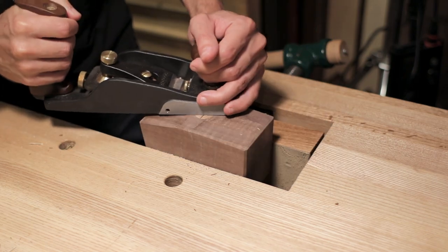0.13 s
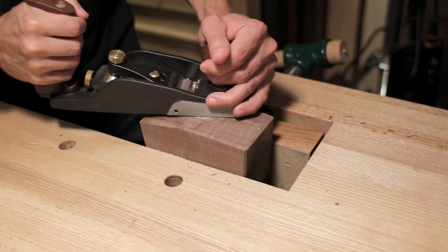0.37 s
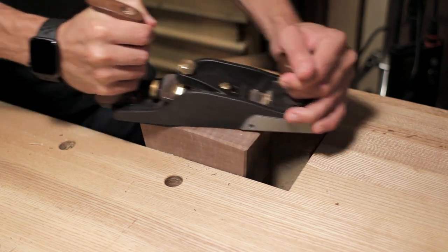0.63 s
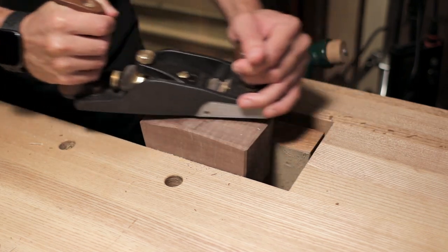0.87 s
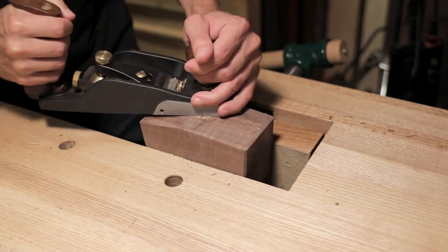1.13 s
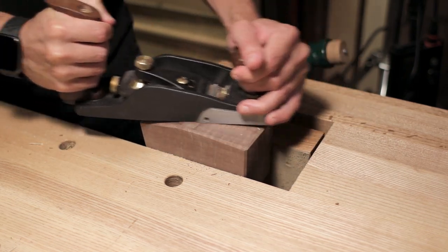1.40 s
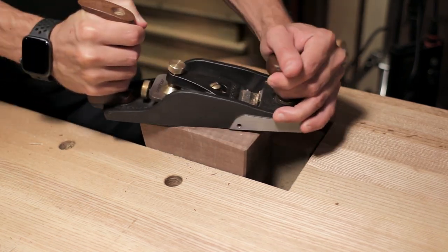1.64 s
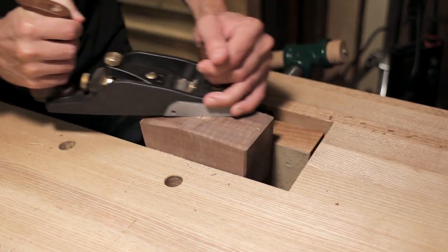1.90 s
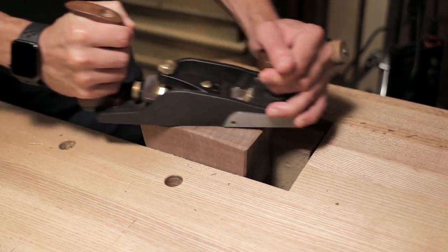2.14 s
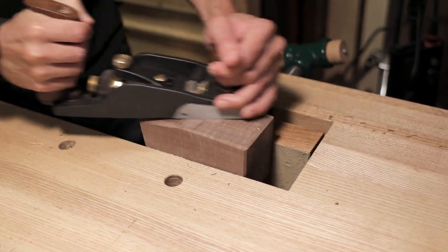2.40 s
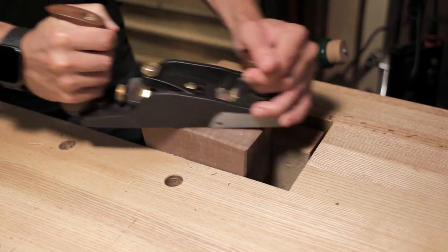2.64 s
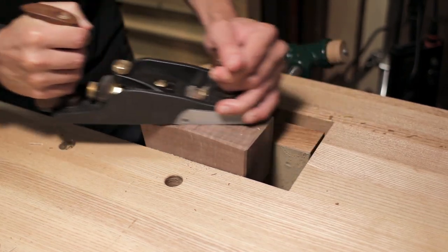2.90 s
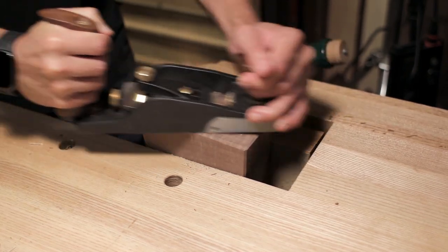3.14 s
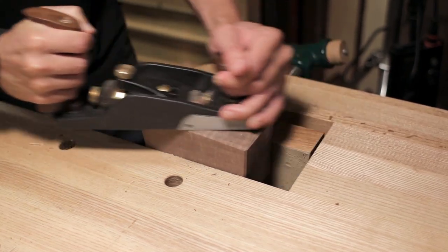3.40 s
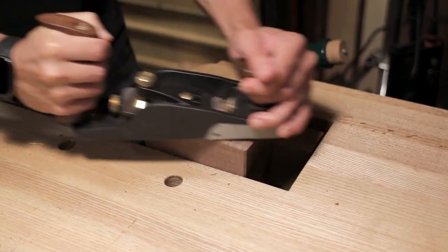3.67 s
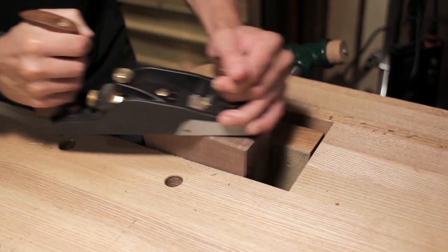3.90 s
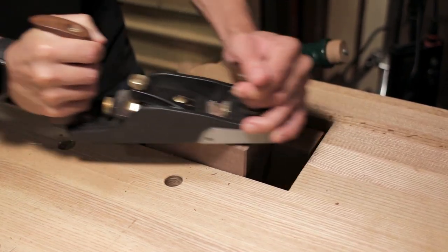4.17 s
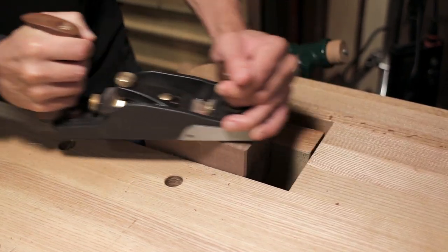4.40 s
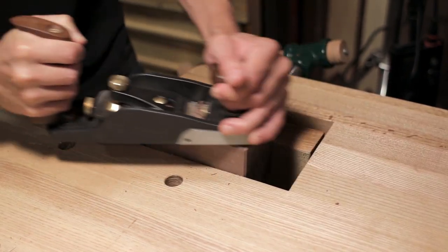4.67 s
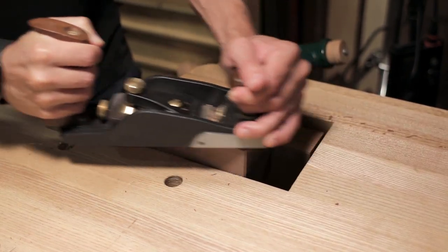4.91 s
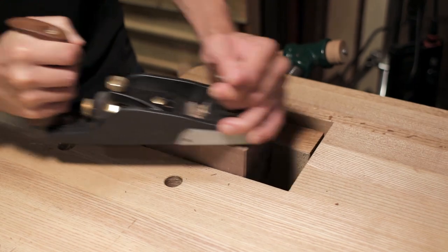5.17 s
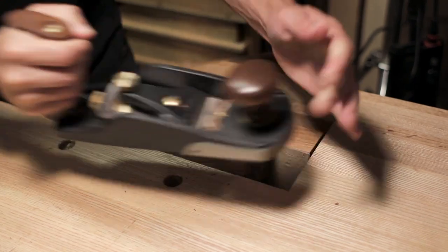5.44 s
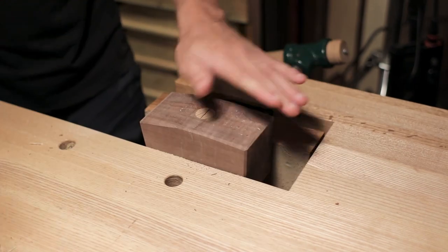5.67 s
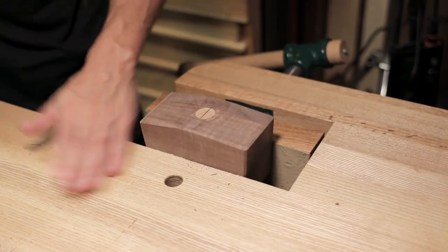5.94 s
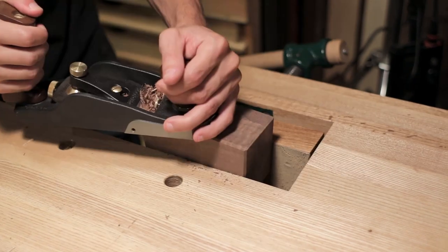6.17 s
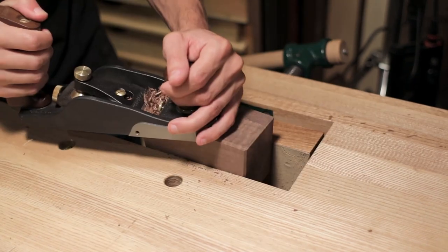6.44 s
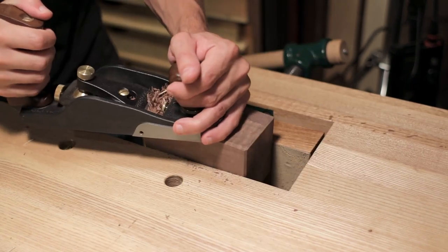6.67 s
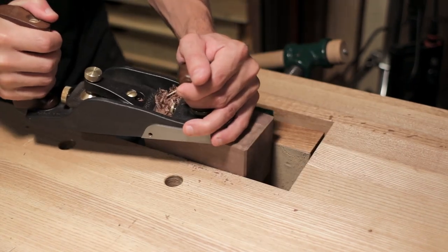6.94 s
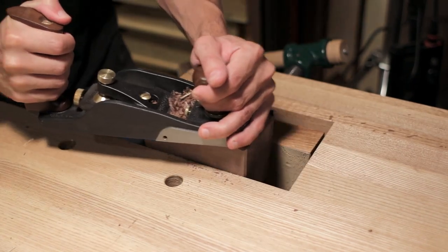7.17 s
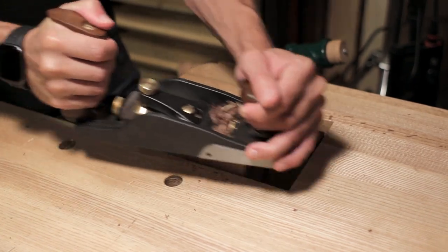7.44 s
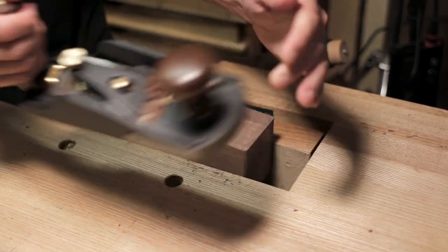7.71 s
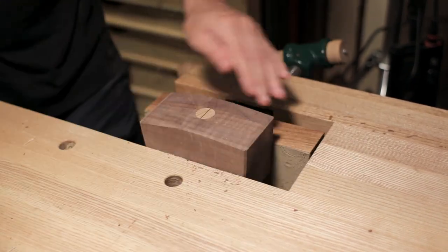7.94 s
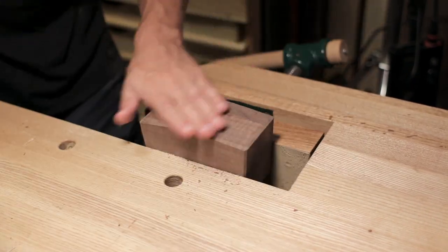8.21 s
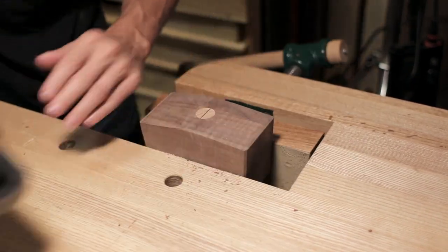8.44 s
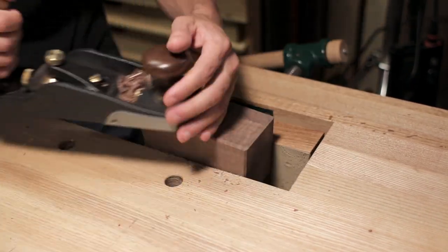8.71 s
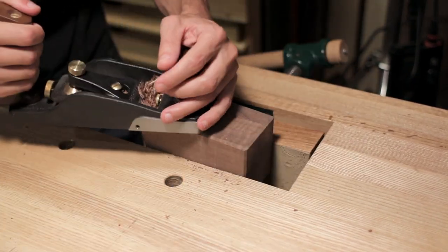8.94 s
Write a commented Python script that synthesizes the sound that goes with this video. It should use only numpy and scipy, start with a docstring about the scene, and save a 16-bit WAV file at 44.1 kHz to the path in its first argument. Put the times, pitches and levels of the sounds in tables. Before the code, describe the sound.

Short gritty planing strokes on end-grain wood, woody thumps between them, then a hard knock and one slow halting scrape over faint room hiss.

```python
"""A small workshop: a metal hand plane takes quick cuts across an end-grain block in a bench vice.
Snapping fibres ring the blade, iron body, bench, sole and lever cap through resonators; between cuts the
sole drops back in dull knocks built from bench modes. The plane drags and rattles, and twice a palm wipes
the block in soft grains. A noise-tap room rings briefly. Filtered noise gives hiss and droning insects,
sines give mains hum, square dips a faint electrical tick. One microphone hears it all."""
import sys
import numpy as np
from scipy import signal
from scipy.fft import rfft, irfft
from scipy.io import wavfile
from scipy.ndimage import uniform_filter1d

SR = 44100
rng = np.random.default_rng(int(sys.argv[2]) if len(sys.argv) > 2 else 0)


def volts_from_decibels(level):
    """Turn decibel levels (scalar or array-like) into linear amplitude factors."""
    exponent = np.asarray(level, float) / 20
    return 10 ** exponent


def file_out(sig):
    """Save sig as 16-bit WAV at sys.argv[1]."""
    # one column per channel
    cols = np.atleast_2d(sig).T
    # limit, then scale
    lim = np.clip(cols, -1, 1)
    pcm = np.round(lim * 32767).astype(np.int16)
    wavfile.write(sys.argv[1], SR, pcm)


N = 400428  # length in samples

# Tone of air and hiss. Each row: frequency in Hz, relative density in dB per Hz.
AIR_TONE = [(20, -10), (40, 0), (60, -20), (85, 3), (120, -4.5), (300, -6), (1000, -13), (2000, -14),
            (4000, -17), (8000, -20.5), (15500, -23)]
# Insect bands. Each row: centre in Hz, width in Hz, level in dB before the creep.
INSECTS = [(2570, 210, -72), (2940, 40, -80), (4780, 230, -76), (5550, 260, -70), (5800, 220, -70)]
# Mains hum. Each row: frequency in Hz, level in dB rms before the creep.
HUM = [(59.6, -73), (119.3, -72)]
# Runs of the electrical tick, 30 a second. Each row: first tick in seconds, end of run in seconds.
TICK_RUNS = [(.0113, 6.1), (6.1252, 9.08)]
# Slow creep of the background. Each row: time in seconds, gain in dB.
CREEP = [(0, -9), (1.05, -7), (1.4, -5), (1.85, -4), (3.5, -1.5), (5.6, -1), (6.1, -0.5), (6.2, -0.2),
         (7.1, 1), (9.1, -0.5)]
# Tone of the faint stereo noise. Each row: frequency in Hz, relative density in dB per Hz.
STEREO_NOISE_TONE = [(25, 20.5), (100, 14), (500, 5), (3000, -0.5), (15000, 2)]
# Decay of the room. Each row: frequency in Hz, t60 in seconds.
ROOM_DECAY = [(100, 0.64), (250, 0.4), (1000, 0.49), (2000, 0.51), (4000, 0.27), (8000, 0.27),
              (15000, 0.52)]
# Palm over the block, one table a wipe. Each row: time in seconds, level in dB.
WIPES = [
    [(5.85, -70), (5.882, -58), (5.94, -48), (6.014, -50), (6.05, -60.5), (6.12, -71)],
    [(8.19, -65.5), (8.304, -50), (8.326, -54.5), (8.356, -50.5), (8.49, -69)],
]
# Tone of skin on wood. Each row: frequency in Hz, relative density in dB per Hz.
SKIN_TONE = [(410, -43), (700, -13), (1320, -2.5), (1730, -9), (2080, -6), (2590, -7), (5290, -2),
             (9230, -5), (15500, -18)]
# Small parts rattle. Each row: start in seconds, click peak in dB, click pitch in Hz, body tap peak in dB.
RATTLES = [(3.9787, -42.5, 7650, -62), (5.47, -47, 6160, -46), (5.4882, -46.5, 7160, -41.5),
           (5.666, -48, 4000, -52), (5.7003, -53, 7100, -52), (6.539, -43, 6900, -61),
           (7.69, -64, 6750, -46), (7.7162, -40.5, 8330, -48), (7.764, -54, 7500, -72)]
# Modes of bench and block. Each row: frequency in Hz, relative level in dB, free t60 in seconds.
BENCH_MODES = [(103, -8, 0.13), (162.8, -21.5, 0.19), (224.5, 2, 0.058), (236.5, 6.5, 0.055),
               (292, -7.5, 0.22), (389, -2, 0.091), (446.6, -2, 0.23), (537, -1.5, 0.089), (618, 7.5, 0.05),
               (702, -6.5, 0.17), (806, -2, 0.3), (868, 11, 0.046), (900, -3.5, 0.034), (1390, -26, 0.091),
               (1750, -8, .07), (2220, -4, .045), (2450, -27, .04), (3600, -30, .03)]
# The plane drawn back, and the palm pushing the block. Each row: start in seconds, level in dB,
# length in seconds.
DRAGS = [(2.301, -53, .05), (2.357, -54, 0.13), (2.846, -49, .07), (3.347, -45, 0.093), (3.887, -39, 0.04),
         (4.362, -47, 0.02), (4.432, -43.5, 0.047), (4.94, -47, 0.049), (5.89, -68, 0.17)]
# The sole lands or rocks. Each row: start in seconds, peak in dB, frequency in Hz favoured by the spot
# struck, contact time scale in ms, gain of the deep modes in dB, factor on ringing time (small when the
# plane stays pressed down).
KNOCKS = [(0.077, -21.5, 620, 0.17, -9, 1), (0.219, -45, 215, 0.35, 15, 1),
          (0.329, -62.5, 217, 0.13, -1, 0.94), (1.102, -14.5, 674, 0.15, -15, 0.92),
          (1.763, -43.5, 222, 0.46, 4, 0.58), (2.049, -39, 410, 0.21, 0.1, 0.55),
          (2.312, -42, 291, 0.41, 0.1, 0.23), (2.366, -44, 213, 0.48, 4, 0.63),
          (2.597, -36.5, 234, 0.24, 3, 0.47), (2.837, -32.5, 310, 0.72, 5, 0.47),
          (2.862, -33, 223, 0.48, 0.1, 0.64), (2.882, -51, 221, 0.37, -4, 1),
          (3.107, -35.5, 237, 0.31, -2, 0.7), (3.345, -34, 277, 0.49, 3, 0.44),
          (3.361, -34.5, 393, 0.35, -2, 1), (3.388, -34, 231, 0.23, 6, 0.43),
          (3.621, -36, 246, 0.45, 3, 0.33), (3.861, -48, 277, 0.25, -2, 0.7),
          (3.884, -20, 257, 0.3, 4, 0.77), (4.125, -34.5, 237, 0.5, -10, 0.36),
          (4.369, -32.5, 299, 0.32, -3, 0.45), (4.404, -20.5, 395, 0.24, -2, 0.93),
          (4.434, -26, 248, 0.45, -1, 0.77), (4.648, -34, 243, 0.41, 0.1, 0.47),
          (4.935, -29, 400, 0.17, -6, 0.76), (5.17, -31.5, 420, 0.27, -15, 0.22),
          (5.854, -43, 191, 1, 32, 0.74), (6.058, -39, 244, 0.64, 22, 0.66),
          (6.448, -9, 410, 0.33, 11, 0.47), (6.761, -45, 513, 0.44, 29, 1),
          (7.386, -31, 291, 0.3, -2, 0.17), (7.514, -26, 261, 0.56, 18, 0.79),
          (7.896, -46, 250, 0.45, -2, 0.99)]
# Quick cuts, the last a scuff as the plane lifts. Each row: bite in seconds, length in seconds, hardest
# shove in seconds after the bite, then rubbing, plane body and bench rumble in dB before FOLLOW.
CUTS = [(0.583, 0.063, 0.063, -55, -50, -53.5), (1.463, 0.1, 0.056, -56.5, -49, -51),
        (1.915, 0.054, 0.061, -54, -46.5, -44.5), (2.144, 0.053, 0.018, -51.5, -43, -44.5),
        (2.449, 0.055, .05, -53.5, -45, -47), (2.684, .047, 0.014, -50, -40, -42),
        (2.975, 0.037, 0.021, -51, -43.5, -42.5), (3.202, .047, 0.023, -49, -40, -39.5),
        (3.499, 0.034, 0.02, -50, -40, -40.5), (3.724, 0.046, 0.017, -46, -36, -37),
        (4, 0.046, 0.024, -49, -39.5, -37), (4.217, 0.043, 0.041, -46, -36, -34),
        (4.509, 0.049, 0.02, -48.5, -39, -33.5), (4.748, 0.057, 0.047, -47.5, -35, -37.5),
        (5.03, 0.066, 0.027, -50.5, -39.5, -36), (5.257, 0.061, 0.044, -47.5, -37, -38),
        (7.685, 0.04, 0.027, -68, -65, -84)]
# One slow, halting cut. Each row: time in seconds, then rubbing, plane body, bench rumble, sole rasp
# and cap buzz in dB.
SLOW_CUT = [(7.29, -70, -62, -69, -70, -74), (7.298, -74, -62, -63, -67, -75),
            (7.32, -63, -58, -60, -57, -67), (7.352, -68, -50.5, -60, -58, -66),
            (7.362, -58, -47, -54, -55, -55), (7.392, -62, -48.5, -42, -54, -54),
            (7.428, -55, -52.5, -58, -57, -50.5), (7.452, -59, -47, -48.5, -50, -57),
            (7.464, -58, -42, -51, -55, -54), (7.484, -50, -41.5, -45, -47.5, -49),
            (7.508, -52, -46, -42, -51, -57), (7.518, -45.5, -39.5, -41, -54, -51),
            (7.54, -74, -49, -50, -66, -68), (7.62, -69, -65, -56, -72, -72)]
# How blade, body, bench, sole and cap, in that order, follow a quick cut. Each row: gain in dB, climb from
# bite to shove in dB, sag after it in dB/s, drop past the far edge in dB/s, lead in seconds, dB gained per
# dB of lightness.
FOLLOW = [(-1.3, 2.5, 42, 1400, 0.0043, 0.1), (0.2, 11.5, 302, 150, 0.0045, -0.19),
          (-1.53, 12, 233, 93, 0.0067, 0.15), (0.5, 2.5, 100, 1500, 0.0013, 0.45),
          (-4, 7, 150, 800, .003, -0.5)]
# Tone of the blade's sizzle. Each row: frequency in Hz, relative density in dB per Hz.
BLADE_TONE = [(3290, -40), (5600, -2.5), (7420, 2), (8110, -5.5), (8990, -7.5), (10400, -12), (15500, -14)]
# Ringing of the blade. Each row: frequency in Hz, width in Hz, relative level in dB.
BLADE_RING = [(7000, 190, -3), (7354, 160, 11.5), (9190, 600, 8), (12400, 170, 2)]
# Ringing of the iron body. Each row: frequency in Hz, width in Hz, relative level in dB.
BODY_RING = [(750, 270, -2), (1004, 155, 1), (1340, 335, -3), (1983, 230, -3), (2033, 98, 1.5),
             (2390, 440, -8.5), (3077, 168, -10)]
# Where the sole sings as it rubs. Each row: frequency in Hz, width in Hz, relative level in dB.
SOLE_RING = [(4630, 1050, -2.5), (5140, 360, 19.5)]
# Ringing of the lever cap over the blade. Each row: frequency in Hz, width in Hz, relative level in dB.
CAP_RING = [(3340, 70, -23), (4000, 39, -6.2)]


def evened(x):
    """Scales to rms 1."""
    return x / np.sqrt(np.mean(x ** 2) + 1e-20)


def read(points, hz):
    """Reads a table on a log-frequency axis."""
    f, value = np.transpose(points)
    return np.interp(np.log(hz + 1), np.log(f + 1), value)


def colour(x, points):
    """Gives x a spectrum."""
    hz = np.fft.rfftfreq(len(x), 1 / SR)
    return irfft(rfft(x) * volts_from_decibels(read(points, hz)), len(x))


def ring(x, hz, width):
    """One damped resonance; at 0 Hz it becomes a gentle low-pass."""
    r = np.exp(-np.pi * abs(width) / SR)
    pole = r * np.exp(2j * np.pi * hz / SR)
    return 2 * signal.lfilter([1 - r], [1, -pole], x).real


def flutter(depth_db, size):
    """Uneven pressure: a gain that wanders over size samples."""
    wander = uniform_filter1d(rng.standard_normal(N), size)
    return volts_from_decibels(depth_db * evened(uniform_filter1d(wander, size)))


def rings(x, table, wander_db):
    """Resonances of alternate sign, each swelling and fading as the grip shifts if wander_db is above 0."""
    out = 0
    for k, (hz, width, db) in enumerate(table):
        out = out + (-1) ** k * volts_from_decibels(db) * ring(x * flutter(wander_db, size=2500), hz, width)
    return out


def fibres(per_s, spread_db):
    """Clicks of random sign and size: fibres that catch and snap."""
    size = volts_from_decibels(spread_db * np.minimum(rng.exponential(1, N), 4.2))
    sign = rng.choice([-1., 1.], N)
    return evened(size * sign * (rng.random(N) < per_s / SR))


def envelope(tables, column):
    """Gain over time from level tables; each fades in over 8 ms, silence between them."""
    t, out = np.arange(N) / SR, np.zeros(N)
    for rows in tables:
        rows = np.array(rows)
        gain = volts_from_decibels(np.interp(t, rows[:, 0], rows[:, column], -200, -200))
        fade_in = np.clip((t - rows[0, 0]) / 0.008, 0, 1)
        out = np.maximum(out, gain * fade_in)
    return uniform_filter1d(out, 130)


def add(mix, s, sound):
    """Mixes a sound in at time s."""
    part = mix[round(s * SR):][:len(sound)]
    part += sound[:len(part)]


def creep():
    """Slow gain of the background noises."""
    return volts_from_decibels(np.interp(np.arange(N) / SR, *np.transpose(CREEP)))


def air():
    """Air and hiss: shaped noise."""
    return volts_from_decibels(-61) * evened(colour(rng.standard_normal(N), AIR_TONE))


def insects():
    """Droning bands of noise, resonated twice for steep sides, each gently wavering."""
    out = 0
    for hz, width, db in INSECTS:
        band = ring(ring(rng.standard_normal(N), hz, width), hz, width)
        out = out + volts_from_decibels(db) * evened(band) * flutter(0.35, size=4000)
    return out


def mains_hum():
    """Steady sines of random phase."""
    t = np.arange(N) / SR
    return sum(np.sqrt(2) * volts_from_decibels(db) * np.sin(2 * np.pi * (hz * t + rng.random())) for hz, db in HUM)


def electrical_tick():
    """Square dips of 0.43 ms, 30 a second, uneven in level."""
    ticks = np.zeros(N)
    for first, last in TICK_RUNS:
        at = (np.arange(first, last, 1 / 30) * SR).astype(int)
        ticks[at] = volts_from_decibels(-50.5 + 2.2 * rng.standard_normal(len(at)))
    return -np.convolve(ticks, np.ones(19))[:N]


def background():
    """Air, insects, hum and tick under one creeping gain."""
    return (air() + insects() + mains_hum() + electrical_tick()) * creep()


def room(x):
    """Sparse taps of random sign, each band dying at its own speed.

    Three random tails crossfade in turn, so no one pattern of taps stays."""
    at, out = np.arange(150, SR - 20, 20), 0
    for k in range(3):
        taps = np.zeros(SR)
        taps[at + rng.integers(0, 20, len(at))] = rng.choice([-1., 1.], len(at))
        hz, t, bands = signal.stft(taps, SR, nperseg=256)
        decay = volts_from_decibels(-60 * t / read(ROOM_DECAY, hz)[:, None])
        tail = signal.istft(bands * decay, SR, nperseg=256)[1]
        turn = np.sqrt(2 / 3) * np.cos(np.pi * (np.arange(N) / SR * 3 + k / 3))
        out = out + signal.oaconvolve(x * turn, tail / np.linalg.norm(tail))[:N]
    return out


def wipes():
    """Skin and dust rub over wood: dense soft grains."""
    grains = evened(colour(fibres(14000, 4.5), SKIN_TONE))
    return grains * flutter(0.76, size=300) * envelope(WIPES, column=1)


def rattles():
    """Small parts of the plane: short bright clicks that also tap the iron body."""
    t, out = np.arange(1500) / SR, np.zeros(N)
    for s, peak_db, hz, body_db in RATTLES:
        puff = rng.standard_normal(len(t)) * volts_from_decibels(-60 * t / 0.024) * np.minimum(t / 0.0013, 1)
        click = ring(puff, hz, 830) + 0.37 * ring(puff, 3700, 5000)
        tap = ring(puff, 1450, 300) + 0.83 * ring(puff, 2450, 150)
        add(out, s, volts_from_decibels(peak_db) * click / abs(click).max() + volts_from_decibels(body_db) * tap / abs(tap).max())
    return out


def drags():
    """Sliding over the block shakes the low bench modes; each slide fades as it slows."""
    shoves, gain = ring(fibres(2300, 5.4), 0, 260), np.zeros(N)
    for s, db, length in DRAGS:
        t = np.arange(0, 1.5 * length, 1 / SR)
        fade_db = -13 * (t / length) ** 2
        add(gain, s, np.minimum(t / 0.0098, 1) * volts_from_decibels(db + fade_db))
    low = [(hz, 3.4 / t60, db) for hz, db, t60 in BENCH_MODES[:7]]
    return rings(shoves * gain, low, 2.86) / np.std(rings(shoves, low, 0))


def knocks():
    """A short push and its rebound ring the bench modes, most those near the spot struck, with a woody scatter."""
    hz, db, t60 = np.transpose(BENCH_MODES)[..., None]
    t, out = np.arange(SR // 3) / SR, np.zeros(N)
    rumble_cut = signal.butter(2, 100, "high", fs=SR, output="sos")
    for s, peak_db, spot_hz, contact_ms, deep_db, free in KNOCKS:
        octaves = np.log2(hz / spot_hz) ** 2  # squared distance from the favoured pitch
        spot_db = -4.5 * octaves / (1 + 0.3 * octaves) + deep_db * (hz < 190)
        modes = volts_from_decibels(db + spot_db - 60 * t / (free * t60)) * np.sin(2 * np.pi * hz * t)
        scatter_gain = volts_from_decibels(18.5 - 60 * t / 0.069) + volts_from_decibels(-7.5 - 60 * t / (free * 0.034))
        scatter = rng.standard_normal(len(t)) * scatter_gain
        u = t[:600] / (contact_ms / 1000)
        push = u ** 2 * np.exp(-1.5 * u)
        bounced = push + 0.33 * np.roll(push, round(0.003096 * SR))  # rebound 3.1 ms later
        blow = signal.oaconvolve(modes.sum(0), bounced) + signal.oaconvolve(scatter, push)
        blow = signal.sosfilt(rumble_cut, blow)
        add(out, s, volts_from_decibels(peak_db) * blow / abs(blow).max())
    return out


def stroke(column, slow_column, follow):
    """Gain of one part over all cuts: it climbs to the hardest shove, sags, and drops past the far edge."""
    db, climb, sag, drop, lead, gain = follow
    middling_db = -7  # rubbing minus body level of an average cut; light skims lie above it
    t, out = np.arange(-0.1, 0.25, 1 / SR), np.zeros(N)  # seconds from the bite
    for row in CUTS:
        s, length, shove = row[:3]
        lightness_db = row[3] - row[4] - middling_db
        past = np.maximum(t - length, 0)
        cut_db = -climb * np.maximum(1 - t / shove, 0) - sag * np.maximum(t - shove, 0) - drop * past
        # the sole slides on after the edge leaves the wood, then rubs faintly while drawn back
        return_db = -28 - 20 * (t / t[-1]) ** 6
        slide_db = np.maximum(-13 - 141 * past, return_db)
        approach_db = -19.5 + 139 * t  # the toe slides up before the edge bites
        bite = np.clip((t + lead) / 0.0073, 0, 1)
        shape = bite * volts_from_decibels(np.maximum(cut_db, slide_db)) + (1 - bite) * volts_from_decibels(approach_db)
        add(out, s + t[0], shape * volts_from_decibels(row[column] + gain * lightness_db))
    return volts_from_decibels(db) * out + envelope([SLOW_CUT], column=slow_column)


def cuts():
    """Snapping fibres shake blade, iron body, bench, sole and cap; levels act before the ringing."""
    snaps, chatter = fibres(7000, 5.0), flutter(1.33, size=200)
    sizzle = evened(colour(fibres(20000, 1.9), BLADE_TONE))
    judder = ring(fibres(900, 2.16), 0, 840)  # slower, rounder shoves reach the heavy bench
    rasp_band = signal.butter(2, [2800, 6000], "band", fs=SR, output="sos")
    rasp = signal.sosfilt(rasp_band, fibres(14000, 2.9))
    loaded = [(hz, 4.17 / t60, db) for hz, db, t60 in BENCH_MODES[:8]]  # pressure widens the bench modes
    # each part: source, resonances, share of plain source, level column in CUTS and in SLOW_CUT
    parts = [(sizzle, BLADE_RING, 0.9, 3, 1), (snaps, BODY_RING, 0, 4, 2), (judder, loaded, 0, 5, 3),
             (rasp, SOLE_RING, 0.2, 3, 4), (rasp, CAP_RING, 0.2, 3, 5)]
    out = 0
    for (x, table, plain, column, slow_column), follow in zip(parts, FOLLOW):
        steady = plain * x + rings(x, table, 0)
        pushed = x * chatter * stroke(column, slow_column, follow)
        out = out + (plain * pushed + rings(pushed, table, 2.78)) / np.std(steady)
    return out


def scene():
    """The work, its room and the background reach one microphone."""
    work = cuts() + drags() + knocks() + rattles() + wipes()
    heard = work + volts_from_decibels(-7.5) * room(work)
    bass_cut = signal.butter(6, 84, "high", fs=SR, output="sos")  # the bench radiates no deep bass
    heard = signal.sosfilt(bass_cut, heard)
    return np.tile(heard + background(), (2, 1))


def band_limit(x):
    """A steep low-pass at the top of the band."""
    return signal.sosfilt(signal.butter(12, 15770, fs=SR, output="sos"), x)


def record(dry):
    """A faint noise, different left and right, follows the background gain."""
    white = rng.standard_normal(dry.shape)
    stereo_noise = np.array([evened(colour(x, STEREO_NOISE_TONE)) for x in white])
    mix = dry + volts_from_decibels(-73) * creep() * stereo_noise
    return band_limit(mix)


dry = scene()
out = record(dry)
file_out(out)
```